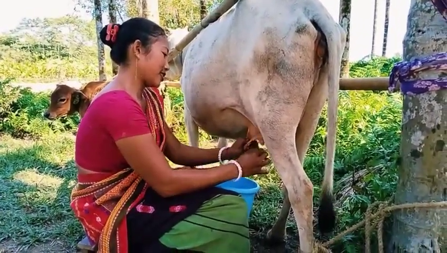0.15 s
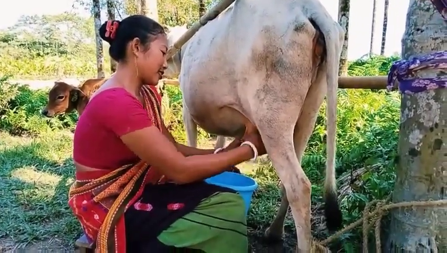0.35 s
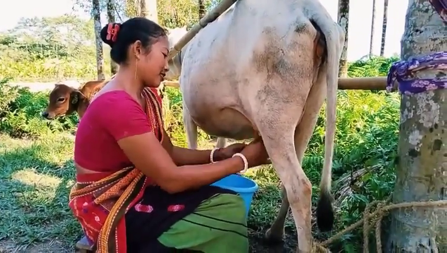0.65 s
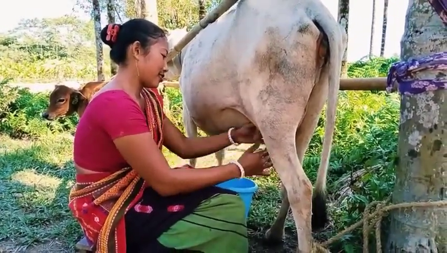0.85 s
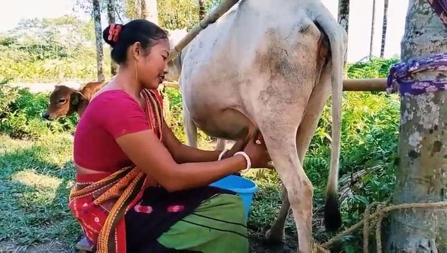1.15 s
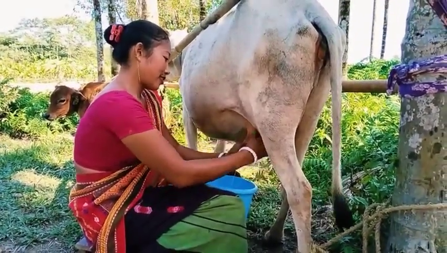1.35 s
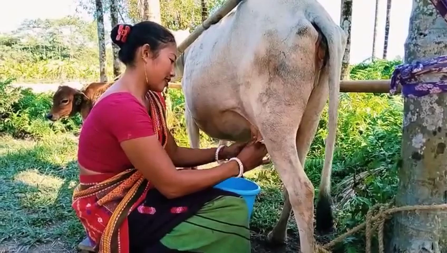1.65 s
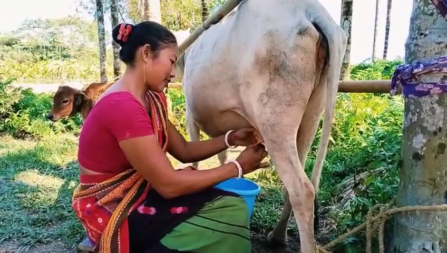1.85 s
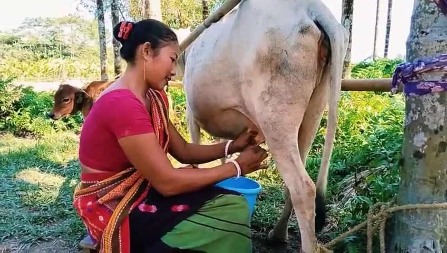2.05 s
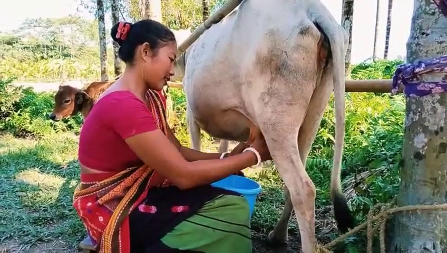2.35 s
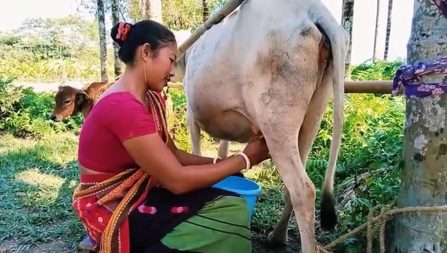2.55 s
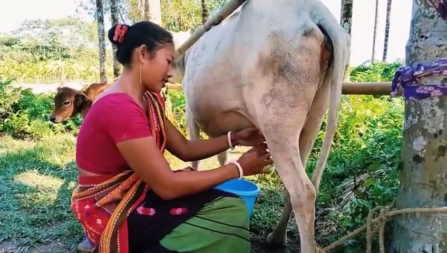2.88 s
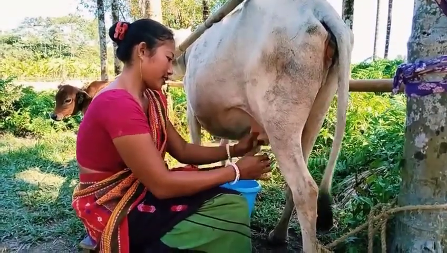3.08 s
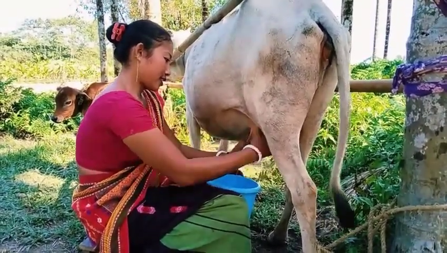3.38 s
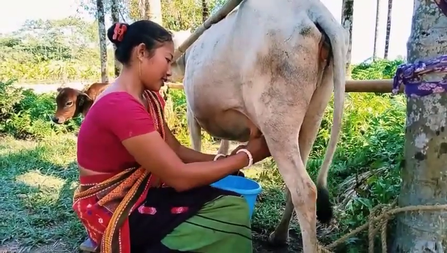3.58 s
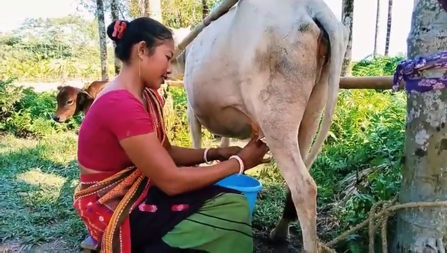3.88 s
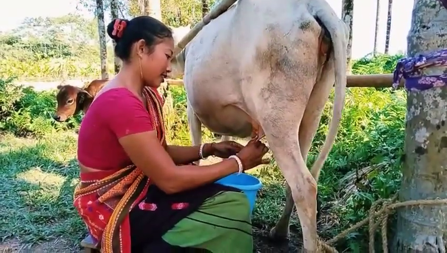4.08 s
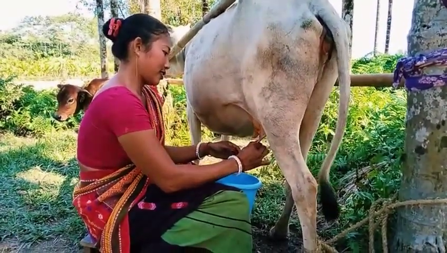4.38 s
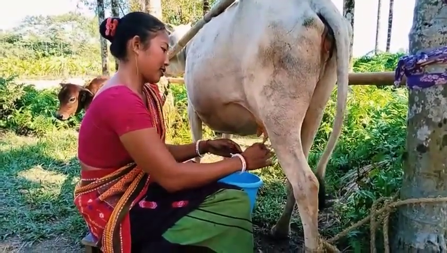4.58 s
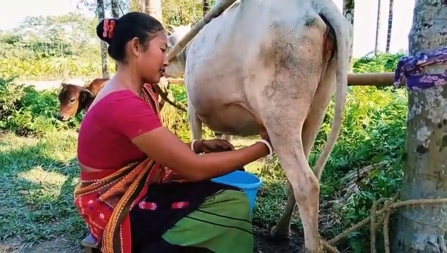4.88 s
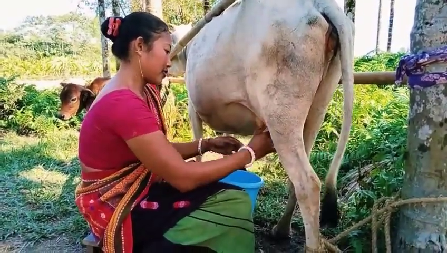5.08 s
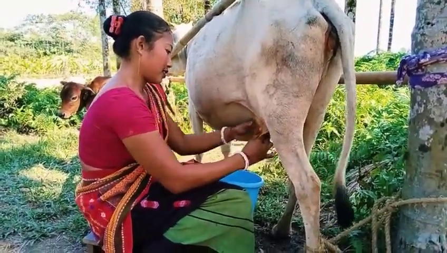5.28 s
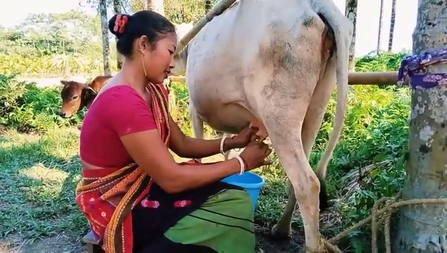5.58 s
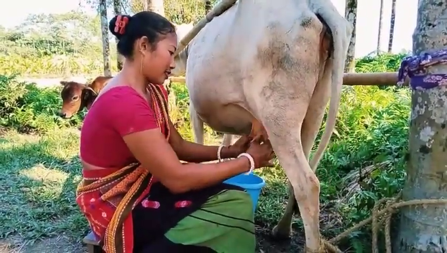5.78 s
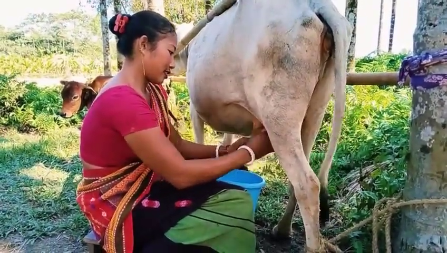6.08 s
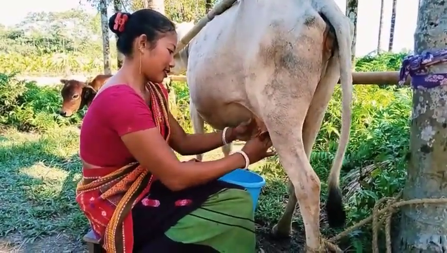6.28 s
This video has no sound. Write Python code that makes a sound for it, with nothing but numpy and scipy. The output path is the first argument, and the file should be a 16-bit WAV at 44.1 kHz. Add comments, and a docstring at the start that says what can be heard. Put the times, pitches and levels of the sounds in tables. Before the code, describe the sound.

A cow is milked by hand outdoors, with a stereo microphone close to a plastic pail. From the start, short jets of milk hiss into the froth at an uneven pace, about ten in six and a half seconds. Most gurgle lower as they slacken, and bursting bubbles and stray droplets tick between them. Far engines make a steady low rumble underneath, with very faint insects and a dying breeze. Around 1 second, in a gap between squirts, a distant bird calls faintly. Near 2.5 seconds a soft, dull bump is followed by two drops plopping into the pail, and the bird calls again at about 3 seconds. The nearer engine dips in speed around 4 seconds, then moves off. The squirts pause briefly from about 4.7 to 5.3 seconds, then continue in front until the end.

```python
"""Outdoors, close to a plastic pail, a cow is milked by hand. From the start, jets hiss into the froth,
most gurgling lower as they slacken, and bursting bubbles tick; far engines drone behind, with insects
and a dying breeze. About a second in, a distant bird calls faintly. At two and a half seconds a dull
bump is followed by two drops plopping into the pail, then the bird again. The nearer engine dips in
speed around four seconds and moves off, while the squirts go on in front of the stereo microphone."""
import sys
import numpy as np
from scipy import signal
from scipy.fft import rfft, irfft, next_fast_len
from scipy.io import wavfile
from scipy.ndimage import map_coordinates

SR = 44100
rng = np.random.default_rng(int(sys.argv[2]) if len(sys.argv) > 2 else 0)


def to_wav(sig):
    """Store sig (one row per channel, or 1-D mono) as 16-bit WAV at the path in sys.argv[1].

    Samples outside -1..1 are clipped; the rate is SR.
    """
    pcm = np.clip(np.atleast_2d(sig), -1, 1) * 32767
    pcm = np.round(pcm).astype(np.int16)
    wavfile.write(sys.argv[1], SR, pcm.T)  # frames by channels


N = 284127


def amp(db):
    """Decibels to gain."""
    return np.exp(np.asarray(db) * (np.log(10) / 20))


def unit(x):
    """x at rms 1."""
    return x / np.sqrt(np.mean(x ** 2) + 1e-20)


def along(points, hz):
    """Interpolate (frequency, value) points on a log frequency axis."""
    freqs, values = np.transpose(points)
    return np.interp(np.log(hz + 1), np.log(freqs + 1), values)


def curves(rows):
    """One value per sample for each column after the time."""
    times, *columns = np.transpose(rows)
    return [np.interp(np.arange(N) / SR, times, column) for column in columns]


def wobble(rate):
    """A smooth random curve of rms 1 without wild peaks, rate knots a second."""
    knots = np.clip(rng.standard_normal(int(N * rate / SR) + 4), -1.6, 1.6)
    return unit(map_coordinates(knots, [np.arange(N) * rate / SR]))


def plateau(s, length, in_db_per_s, out_db_per_s):
    """A dB curve that is 0 from s for length seconds and falls away on both sides."""
    silent = -120
    corners = [s + silent / in_db_per_s, s, s + length, s + length - silent / out_db_per_s]
    return np.interp(np.arange(N) / SR, corners, [silent, 0, 0, silent])


def progress(s, length):
    """0 before time s, rising to 1 over length seconds."""
    return np.clip((np.arange(N) / SR - s) / max(length, .001), 0, 1)


def add(track, s, sound):
    """Mix a sound into a track at time s."""
    room = track[max(round(s * SR), 0):][:len(sound)]
    room += sound[:len(room)]


def filtered(x, response):
    """x times a complex response of frequency."""
    size = next_fast_len(N + SR // 4)
    return irfft(rfft(x, size) * response(np.fft.rfftfreq(size, 1 / SR)), size)[..., :N]


def coloured(x, spectrum):
    """x given a spectrum, at rms 1."""
    return unit(filtered(x, lambda hz: amp(along(spectrum, hz))))


# Squeezes of a teat: (time [s], rise [s], hold [s], fade [s], jet level [dB], start of rise [dB re jet],
# loss over fade [dB], spray offset [dB], wall offset [dB], gurgle start [Hz], gurgle end [Hz])
SQUIRTS = [ (-.05, 0.016, 0.032, 0.18, -36.5, -14, 27.5, 4.5, -9, 1410, 1255),
           (0.265, 0.053, 0.14, 0.1, -35, -16, 7.5, -4.5, -9, 1427, 1428),
           (1.254, 0.038, 0.24, 0.042, -33, -11, 8.5, -3, -5, 1660, 1143),
           (1.817, 0.085, 0.19, 0.14, -38.5, -24.5, 19, -2, -5, 2055, 1270),
           (2.335, 0.037, 0.15, 0.02, -33.5, -21, 13, -6, -5.5, 1410, 1494),
           (3.342, 0.073, 0.26, 0.096, -35, -17, 8, -1.5, -8, 1950, 1107),
           (3.846, 0.19, 0.08, 0.52, -36, -26, 12, 0, -3, 1672, 1140),
           (5.288, 0.13, 0.25, 0.11, -42.5, -5.5, 26.5, -2.5, -3, 2070, 1163),
           (5.887, 0.061, 0.1, 0.18, -33.5, -29.5, 27, -3, -2.5, 2110, 1131),
           (6.241, 0.021, 0.22, 0.09, -43, -13, 9, -1.5, -4, 1650, 1510), ]
# The hand's pressure changes for an instant: (time [s], half-width [s], level change [dB])
SURGES = [(.44, 0.019, 2), (1.995, 0.0028, 11), (2.508, 0.035, -0.5), (3.901, 0.045, 9.5),
          (5.49, 0.028, 6.5), (6.44, 0.017, 4.5)]
# Thin dribbles between squirts: (time [s], length [s], level [dB])
DRIBBLES = [(1.805, 0.025, -58), (2.241, 0.031, -53.5), (2.578, 0.056, -57), (3.799, 0.093, -56),
            (5.245, 0.035, -56), (5.77, 0.052, -65)]
TEAT_DB_PER_S = 6000, 804  # the teat opens at once and closes more slowly
FULL_JET_DB, SPRAY_DB_PER_DB = -42, 0.13  # the weaker the jet, the larger its share of spray


def squeezes():
    """Each squeeze rises, holds and fades: gains of jet, spray and wall, and the gurgle's pitch."""
    t, gains, pitch = np.arange(N) / SR, np.zeros((3, N)), np.zeros(N)
    surge_db = sum(db * np.exp(-((t - s) / width) ** 2) for s, width, db in SURGES)
    for s, rise, hold, fade, db, entry_db, loss_db, spray_db, wall_db, start_hz, end_hz in SQUIRTS:
        length = rise + hold + fade
        rise_db = entry_db * (1 - progress(s, rise) ** 0.71)
        fade_db = loss_db * progress(s + rise + hold, fade) ** 0.96
        jet_db = db + surge_db + rise_db - fade_db
        thin_db = SPRAY_DB_PER_DB * (FULL_JET_DB - jet_db)
        flow = amp(jet_db + plateau(s, length, *TEAT_DB_PER_S))
        gains += [flow, flow * amp(spray_db + thin_db), flow * amp(wall_db)]
        through = progress(s, length)
        glide_hz = np.interp(through, [.15, .6], [start_hz, end_hz])  # slack jets trap larger bubbles
        pitch = np.where(through > 0, glide_hz, pitch)
    for s, length, db in DRIBBLES:
        gains[:2] += amp(db + plateau(s, length, *TEAT_DB_PER_S))
    return *gains, pitch


def droplets(rate, spread_db):
    """Random impacts of log-normal size, rate a second."""
    chance, size, sign = rng.random(N), rng.standard_normal(N), rng.choice([-1, 1], N)
    return (chance < rate / SR) * sign * amp(spread_db * np.clip(size, -2.5, 2.5))


def shifting(x, width_hz, span_s, depth_db=1.6):
    """The hollow dug by the jet keeps changing shape, so its resonances come and go."""
    hz, t, spectra = signal.stft(x, SR, nperseg=512)
    knots = np.meshgrid(hz / width_hz, t / span_s, indexing="ij")
    shift_db = depth_db * map_coordinates(rng.standard_normal((128, 512)), knots, mode="wrap")
    return unit(signal.istft(spectra * amp(shift_db), SR, nperseg=512)[1][:N])


def bubbles(pitch_hz, scatter, cycles, spread_db, count):
    """Damped sines scattered round a pitch curve; each rises a little as it nears the surface."""
    start = rng.integers(0, N, count)
    detune, size = np.clip(rng.standard_normal((2, count, 1)), -2, 2)
    age = np.arange(SR // 80)
    turns = pitch_hz[start, None] * np.exp(scatter * detune) * age / SR
    life = turns / cycles
    envelope = amp(spread_db * size) * np.exp(-life) * (1 - np.exp(-turns))
    ring = envelope * np.sin(2 * np.pi * turns * (1 + 0.021 * life))
    return unit(np.bincount((start[:, None] + age).ravel(), ring.ravel(), N)[:N])


def low_cut(x, lowest_hz=960):
    """Bubbles radiate little below the pitch of the largest."""
    highpass = signal.butter(14, lowest_hz, "high", analog=True)
    return filtered(x, lambda hz: signal.freqs(*highpass, hz)[1])


# Modes of the pail's air and wall: (frequency [Hz], width [Hz], gain [dB])
PAIL_MODES = [(428.4, 57, 5.5), (671, 32, -7), (1124, 84, 6.5), (1176, 138, 8.5), (1520, 159, 11),
              (2047, 240, 5)]


def pail(x):
    """x rung through the modes of the pail, with deep valleys between them."""
    return filtered(x, lambda hz: sum(
        amp(db) * (1j * hz * width / (centre ** 2 - hz ** 2 + 1j * hz * width)) ** 2
        for centre, width, db in PAIL_MODES))


# The jet breaks through the froth: (time [s], length [s], gurgle gain [dB], pail ring offset [dB])
PLUNGES = [(-.01, 0.12, -39.5, -7), (0.502, 0.045, -35.5, -9), (1.39, 0.15, -39, 4),
           (1.485, 0.065, -30.5, 2), (1.976, 0.2, -40.5, -1), (2.506, 0.025, -37.5, -2.5),
           (3.43, 0.091, -40, 8), (3.55, 0.066, -34, 4.5), (3.679, 0.077, -41.5, 7),
           (3.872, 0.2, -44.5, -5.5), (4.058, 0.15, -41, 4), (4.25, 0.26, -35, -9),
           (4.502, 0.068, -42.5, 4), (5.457, 0.08, -40, -1), (5.492, 0.17, -32.5, -7.5),
           (6.049, 0.084, -34.5, -3), (6.326, 0.16, -46, 2)]


def plunges(jet, skim_db=-18):
    """Gains of gurgle and pail ring: faint on the froth, strong while the jet digs into the milk."""
    gains = amp([[skim_db], [skim_db]]) * jet
    for s, length, db, ring_db in PLUNGES:
        dig_db = db + plateau(s, length, in_db_per_s=802, out_db_per_s=416.5)  # opens, then collapses
        gains = np.maximum(gains, amp(dig_db) * amp([[0], [ring_db]]))
    return gains


# Spectra of the splash, the fine spray and the plastic wall: (frequency [Hz], relative level [dB])
SPLASH_SPECTRUM = [(850, -47), (1300, -6), (1900, -0.5), (2500, -1.5), (3400, -4), (4100, 1.5),
                   (4700, -1.5), (6300, 1.5), (8200, -5.5), (10000, -20), (15000, -34)]
SPRAY_SPECTRUM = [(4000, -34.5), (7000, 7), (8600, 6.5), (10500, 2.5), (12200, -8), (14000, -9.5),
                  (15400, -18), (16300, -20)]
WALL_SPECTRUM = [(2000, -47), (2750, -12.5), (3030, -5.5), (3350, -15), (4500, -30)]


def jets(jet, spray, wall, pitch):
    """Close up, each jet breaks into droplets that burst the froth and drive bubbles into the milk."""
    plunge, ring = plunges(jet)
    sputter = amp(np.clip(wobble(55) + 1.84 * wobble(340), -7, 7))  # the stream beads unevenly
    fine = unit(droplets(rate=9000, spread_db=3.0))
    coarse = amp(-6.5) * unit(droplets(rate=220, spread_db=5.0))
    splash = shifting(coloured(fine + coarse, SPLASH_SPECTRUM), width_hz=1215, span_s=0.045)
    mist = coloured(droplets(rate=7700, spread_db=10.5), SPRAY_SPECTRUM)
    mist = shifting(mist, width_hz=1000, span_s=0.053)
    froth = bubbles(np.full(N, 4800.), scatter=0.346, cycles=13, spread_db=10, count=6500)
    gurgle = bubbles(pitch, scatter=0.16, cycles=11, spread_db=6.5, count=3000)
    gurgle = unit(gurgle + unit(pail(gurgle)))  # the pail picks out the bubbles near its modes
    body = unit(pail(droplets(rate=700, spread_db=3.0)))
    hiss = jet * (splash + amp(-15) * froth) + spray * amp(-3.5) * mist
    wall_hits = wall * amp(1.5) * coloured(droplets(rate=2500, spread_db=2.5), WALL_SPECTRUM)
    wet = hiss + wall_hits + (plunge + amp(-16) * jet) * amp(-8) * gurgle
    return low_cut(sputter * wet) + ring * amp(-5) * body


# Spectrum of drops on the rim: (frequency [Hz], relative level [dB])
RIM_SPECTRUM = [(1500, -39), (3000, -17.5), (8000, 5), (11500, -8), (15500, 5)]


def spatter(flow):
    """Stray drops of the spray strike the rim one by one."""
    return flow * amp(-8.5) * coloured(droplets(rate=170, spread_db=4), RIM_SPECTRUM)


def engine(hz, first_db, second_db, third_re_second_db, unsteady_db):
    """An engine a long way off: only the lowest three firing orders carry to the microphone."""
    phase = 2 * np.pi * (np.cumsum(hz) / SR + rng.random()) + 0.011 * wobble(9.5)
    orders = enumerate([first_db, second_db, second_db + third_re_second_db], 1)
    return np.sqrt(2) * sum(amp(db + unsteady_db * wobble(12)) * np.sin(k * phase) for k, db in orders)


# Speed of the nearer engine: (time [s], firing rate [Hz])
NEAR_ENGINE = [(0.0, 61.5), (0.12, 59.7), (0.75, 59.1), (1.0, 55.4), (1.25, 58.0), (1.68, 56.3),
               (2.49, 59.1), (3.8, 55.4), (4.07, 47.7), (4.68, 51.3), (5.06, 59.3), (6.01, 61.2),
               (6.31, 57.8), (6.44, 62.0)]
# The farther engine: (time [s], firing rate [Hz], fundamental [dB], second order [dB])
FAR_ENGINE = [(0, 37, -73, -52), (.8, 42.5, -83, -49.5), (1.45, 45, -52.5, -52.5), (1.8, 40, -47, -70.5),
              (2.5, 33.5, -47, -59), (3.2, 27, -55, -44), (5.5, 33, -69, -53.5), (6.44, 38, -54, -76)]


def engines():
    """The nearer engine dips in speed and moves off; behind it another winds down and picks up."""
    hz, = curves(NEAR_ENGINE)
    receding_s = np.maximum(np.arange(N) / SR - 4.5, 0)
    first_db = -37 - 4.5 * receding_s
    second_db = -46.5 - 11 * receding_s  # the upper orders fade first
    near = engine(hz, first_db, second_db, third_re_second_db=-20.5, unsteady_db=1.0)
    return near + engine(*curves(FAR_ENGINE), third_re_second_db=-26, unsteady_db=3.0)


# Spectrum of the low rumble: (frequency [Hz], relative level [dB])
RUMBLE_SPECTRUM = [(15, -25.5), (30, -0.5), (48, 3.5), (66, 10), (82, -3.5), (110, -8), (160, -15),
                   (210, -27.5), (280, -36), (500, -73.5)]


def rumble():
    """A distant rumble in the centre, easing near the end, and a fainter one spread wide."""
    level_db = np.interp(np.arange(N) / SR, [5.2, 6.4], [-42.5, -44.5]) + 0.18 * wobble(4.2)
    centre = amp(level_db) * coloured(rng.standard_normal(N), RUMBLE_SPECTRUM)
    wide_spectrum = [(25, -12), (60, 8), (150, -7.5), (300, -23.5), (600, -40)]
    return centre + amp(-56) * coloured(rng.standard_normal((2, N)), wide_spectrum)


# Spectrum of the open air: (frequency [Hz], relative level [dB])
AIR_SPECTRUM = [(150, -2), (330, 0.5), (800, 3.5), (1500, -5), (1800, 6.5), (2050, -6.5), (3600, -14),
                (4800, -5), (5600, -15.5), (6900, -4), (7800, -6.5), (11500, -26), (15000, -8)]


def open_air():
    """The soft, slowly swelling hush of the field, a little to the right."""
    swell = amp(-70 + wobble(2.54))
    hush = coloured(rng.standard_normal((2, N)) + rng.standard_normal(N), AIR_SPECTRUM)
    return swell * hush * amp([[-1.3], [1.3]])


# Spectrum of the insect chorus: (frequency [Hz], relative level [dB])
INSECT_SPECTRUM = [(8100, -45), (8550, -16.5), (8850, -15), (9030, -10.5), (9220, -17), (10450, -21),
                   (11200, -48.5)]
# Its swell and ebb: (time [s], level [dB])
INSECT_LEVEL = [(.2, -66), (.75, -68), (1.6, -63), (2.7, -66), (3.05, -64), (6.44, -65.5)]


def insects():
    """A high band of insects out in the field, a little to the left."""
    level_db, = curves(INSECT_LEVEL)
    chorus = coloured(rng.standard_normal((2, N)), INSECT_SPECTRUM)
    return amp(level_db) * chorus * amp([[1.3], [-1.3]])


# Spectrum of a soft breeze in the leaves: (frequency [Hz], relative level [dB])
BREEZE_SPECTRUM = [(300, -30.5), (650, -3.5), (1300, -1.5), (2200, -9), (4000, -15.5), (8000, -32)]


def breeze(start_db=-67, db_per_s=-2):
    """Leaves rustle all round the microphone and die away."""
    level_db = start_db + db_per_s * np.arange(N) / SR
    return amp(level_db) * coloured(rng.standard_normal((2, N)), BREEZE_SPECTRUM)


# Wet ticks at the rim: (time [s], level [dB], pitch [Hz], crackle [dB re the pocket's peak])
TICKS = [(0.0475, -17, 8100, -29), (0.147, -28, 6300, -10), (.267, -33.5, 8400, -3), (0.473, -31, 3000, -8),
         (0.9285, -38.5, 7040, -3), (0.977, -21.5, 7950, -7.5), (1.251, -33, 9350, -3),
         (1.613, -31.5, 2780, -5.5), (1.828, -29, 7500, -5.5), (1.879, -26.5, 4000, -11),
         (1.9988, -21.5, 3190, -18), (2.244, -26.5, 6900, -12), (2.337, -31.5, 8050, -3),
         (3.343, -34, 11700, -4), (3.438, -15.5, 7800, -6), (3.8592, -30.5, 1810, 0), (4, -32, 1430, 8),
         (4.028, -18.5, 7800, -17), (4.068, -13, 7740, -23), (4.111, -18.5, 8000, -12),
         (4.296, -15, 8300, -15), (5.2887, -18, 6440, -27), (5.3026, -15, 7800, -17),
         (5.538, -28, 6070, -2), (5.6427, -18.5, 7400, -32), (5.7703, -35.5, 7860, -20),
         (5.804, -43, 2800, -17), (5.893, -31, 8500, -6.5), (6.2286, -32, 8380, -6), (6.296, -38, 4970, 5),
         (6.3224, -21, 9650, -5), (6.432, -20.5, 3030, -22)]


def ticks(pocket_cycles=4.8, crackle_t60_s=.028):
    """A bubble bursts or a teat spits: a pocket of air rings for a few cycles and the film crackles."""
    out, t = np.zeros(N), np.arange(SR // 20) / SR
    for s, db, hz, crackle_db in TICKS:
        highpass = signal.butter(3, min(0.7 * hz, 12000), "high", fs=SR, output="sos")
        film = signal.sosfilt(highpass, rng.standard_normal(len(t)))
        film = unit(film + 1.2 * signal.lfilter(*signal.iirpeak(hz, 3, SR), film))
        crackle = amp(crackle_db - 60 * t / crackle_t60_s) * film
        pocket = np.sin(2 * np.pi * hz * t) * np.exp(-hz * t / pocket_cycles) * (1 - np.exp(-hz * t))
        add(out, s, amp(db) * (pocket / pocket.max() + crackle))
    return low_cut(out)


# Hollows in the froth: (time [s], length [s], start [Hz], end [Hz], width over pitch [ratio], level [dB])
HOLLOWS = [(.3, 0.083, 1441, 1430, 0.13, -44.5), (0.383, 0.038, 2085, 1910, 0.17, -53),
           (1.26, 0.096, 1700, 1360, 0.16, -42.5), (1.285, 0.062, 6800, 5080, 0.5, -30.5),
           (1.978, 0.041, 3200, 3115, 0.21, -34), (2.352, 0.12, 1555, 1294, 0.18, -51),
           (2.481, 0.065, 1577, 1526, 0.11, -40.5), (2.486, 0.031, 6230, 4500, 0.8, -27.5),
           (3.347, 0.11, 1800, 1210, 0.23, -46), (3.546, 0.13, 3080, 3020, .14, -33.5),
           (3.68, 0.079, 1700, 1468, 0.23, -33.5), (4.005, 0.054, 2100, 1910, 0.15, -38.5),
           (4.446, 0.07, 1630, 1496, 0.22, -39), (5.291, 0.18, 2110, 2000, 0.084, -44),
           (5.415, 0.04, 1750, 1043, 0.32, -41.5), (5.5, 0.18, 1170, 1230, 0.3, -42),
           (5.919, 0.125, 2075, 1760, 0.53, -45), (5.922, 0.16, 3060, 3160, .22, -33),
           (5.981, 0.051, 6520, 3730, 0.9, -29), (6.046, 0.169, 1254, 1123, 0.34, -45),
           (6.387, 0.086, 2120, 1864, 0.26, -39.5)]


def hollows():
    """The jet drills hollows whose fluttering ring mostly slides down as they deepen."""
    out = np.zeros(N)
    sway, flutter = np.exp(.05 * wobble(70)), unit(amp(3.5 * wobble(80)))
    for s, length, start_hz, end_hz, width, db in HOLLOWS:
        through = np.linspace(0, 1, int(length * SR))
        hz = start_hz * (end_hz / start_hz) ** through * np.roll(sway, -round(s * SR))[:len(through)]
        turns = np.cumsum(hz) / SR
        # two slow random amplitudes make a band of noise round the pitch
        cos_gain, sin_gain = (map_coordinates(knots, [turns * width], mode="wrap")
                              for knots in rng.standard_normal((2, 256)))
        ring = unit(cos_gain * np.cos(2 * np.pi * turns) + sin_gain * np.sin(2 * np.pi * turns))
        add(out, s, amp(db) * np.sqrt(np.abs(np.sin(np.pi * through))) * ring)
    return low_cut(out * flutter)


# Distant bird notes: (time [s], length [s], start [Hz], end [Hz], relative level [dB])
BIRD_NOTES = [(0.848, 0.058, 4170, 4030, -51), (0.985, 0.053, 3050, 4000, -59),
              (1.031, 0.049, 4300, 4440, -53), (1.069, 0.043, 4460, 3835, -47.5),
              (1.116, 0.028, 3800, 3300, -54), (2.971, 0.094, 4760, 4880, -70),
              (3.183, 0.087, 3740, 3470, -54)]


def birds(trees_t60_s=0.37):
    """Rough, wavering calls, smeared by the trees on their way to the microphone."""
    song, waver = np.zeros(N), 1 + .02 * wobble(400)
    for s, length, start_hz, end_hz, db in BIRD_NOTES:
        through = np.linspace(0, 1, int(length * SR))
        hz = (start_hz + (end_hz - start_hz) * through) * waver[round(s * SR):][:len(through)]
        add(song, s, amp(db) * np.sin(np.pi * through) * np.sin(2 * np.pi * np.cumsum(hz) / SR))
    t = np.arange(SR // 3) / SR
    trees = rng.standard_normal((2, len(t))) * amp(-60 * t / trees_t60_s)
    echo = signal.fftconvolve(song[None], trees / np.linalg.norm(trees[0]), axes=1)[:, :N]
    return amp(-8.5) * song + amp(-3) * echo


def bump(at_s=2.41, half_width_s=0.07):
    """One dull bump in the background."""
    swell = np.exp(-((np.arange(N) / SR - at_s) / half_width_s) ** 2)
    thud = coloured(rng.standard_normal(N), [(100, -37), (150, 11), (200, -2), (300, -53)])
    return amp(-49) * swell * thud


# Heavy drops into the pail: (time [s], relative level [dB])
DROPS = [(2.566, -19), (2.604, -26)]


def drops():
    """Heavy drops knock on the milk and ring the air in the pail."""
    out, t = np.zeros(N), np.arange(SR // 10) / SR
    knock = pail(signal.unit_impulse(N))[:len(t)] * amp(-60 * t / 0.24)
    knock = signal.sosfilt(signal.butter(2, 1500, fs=SR, output="sos"), knock)  # a soft contact
    air = np.sin(2 * np.pi * 458 * t) * amp(-60 * t / 0.058) * (1 - np.exp(-t / 0.0057))
    for s, db in DROPS:
        add(out, s, amp(db - 5) * (knock / np.abs(knock).max() + 0.78 * air))
    return out


# Balance of the pail at the microphone: (frequency [Hz], left minus right [dB])
PAIL_BALANCE = [(100, -17), (430, -1), (1150, -3.5), (1550, 0), (2400, -2), (4200, -2), (6500, -1),
                (9000, 1.5), (12000, 5.5), (15000, 5)]


def pail_to_microphone(x, scatter_db, t60_s, lag_samples, shade):
    """The pail's wall shades the direct treble and rattles it round; the left side hears it later."""
    hop = SR // 24
    t, echo = np.arange(hop) / SR, np.zeros((2, N))
    window = np.sin(np.pi * np.arange(2 * hop) / (2 * hop))
    padded = np.pad(x, (0, 2 * hop))
    for start in range(0, N, hop):  # the point of impact wanders, and the wall echoes change with it
        grain = padded[start:start + 2 * hop] * window
        for channel in echo:
            tail = rng.standard_normal(hop) * amp(-60 * t / t60_s) * (t > .0004)
            add(channel, start / SR, signal.fftconvolve(grain, tail / np.linalg.norm(tail)))
    echo_spectrum = [(400, -13), (1200, -9), (2200, -3), (4000, -2), (12000, 5)]
    echo = filtered(echo, lambda hz: amp(scatter_db + along(echo_spectrum, hz)))
    shadow = [(1500, -3), (8000, -10.5), (13000, -21)]
    side = np.array([[1], [-1]])
    delay = lambda hz: np.exp(-1j * np.pi * side * hz * lag_samples / SR)
    direct = filtered(x, lambda hz: amp(shade * along(shadow, hz)) * delay(hz))
    return filtered(direct + echo, lambda hz: amp(side * along(PAIL_BALANCE, hz) / 2))


def scene():
    """The milking close in front, deep in the pail and at its rim; the countryside far behind."""
    jet, spray, wall, pitch = squeezes()
    deep = jets(jet, spray, wall, pitch) + hollows() + drops()
    deep = pail_to_microphone(deep, scatter_db=1.0, t60_s=0.017, lag_samples=2.23, shade=0.86)
    rim = ticks() + spatter(jet + spray)
    rim = pail_to_microphone(rim, scatter_db=-3.5, t60_s=0.023, lag_samples=1.55, shade=0.44)
    return deep + rim + rumble() + bump() + engines() + birds() + open_air() + insects() + breeze()


def record(dry):
    """The recorder keeps nothing above its band limit."""
    top_hz = 15700
    return filtered(dry, lambda hz: 1 / (1 + (hz / top_hz) ** 160))


dry = scene()
out = record(dry)
to_wav(out)
```